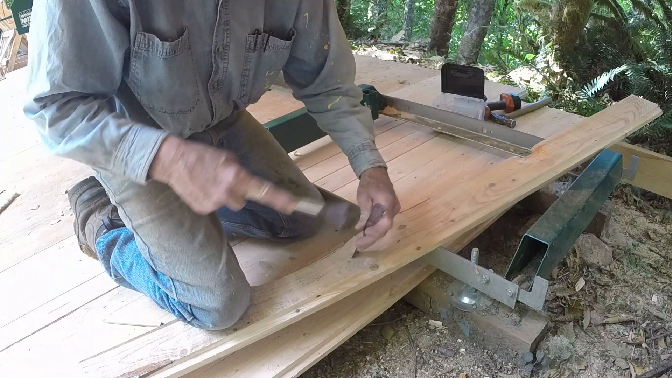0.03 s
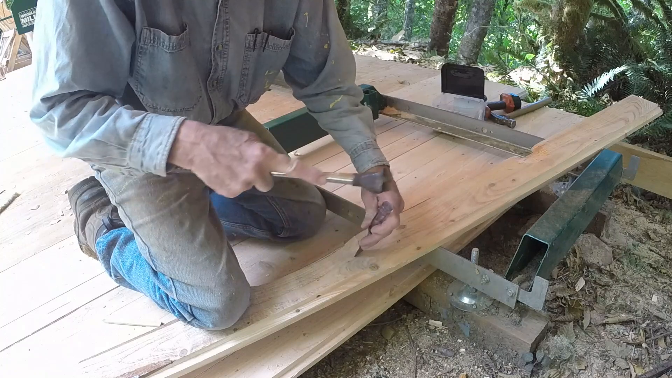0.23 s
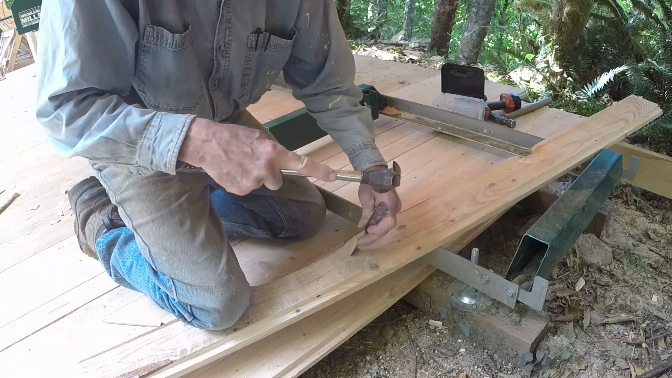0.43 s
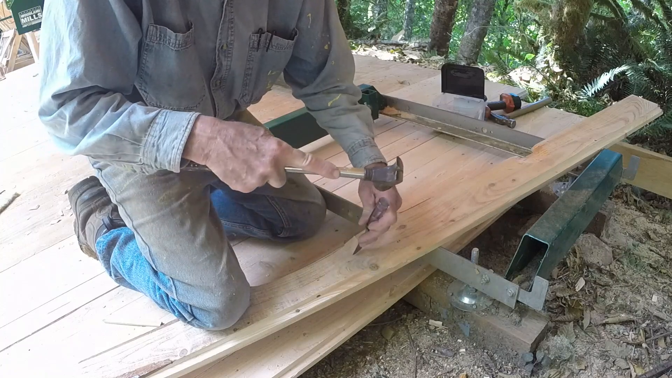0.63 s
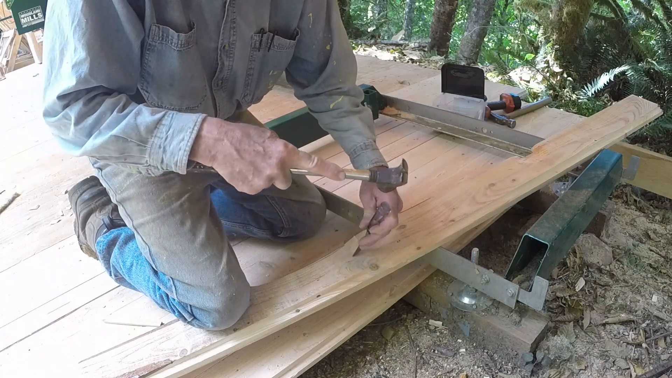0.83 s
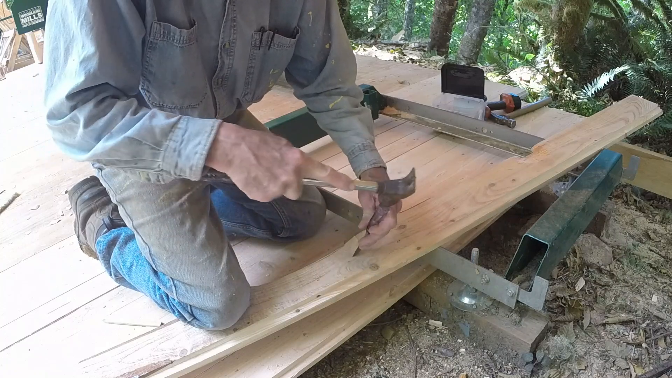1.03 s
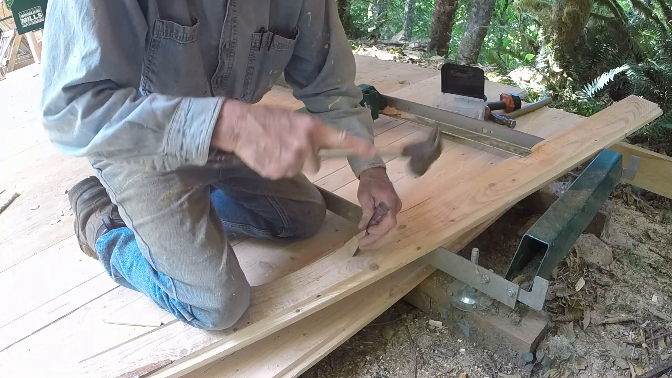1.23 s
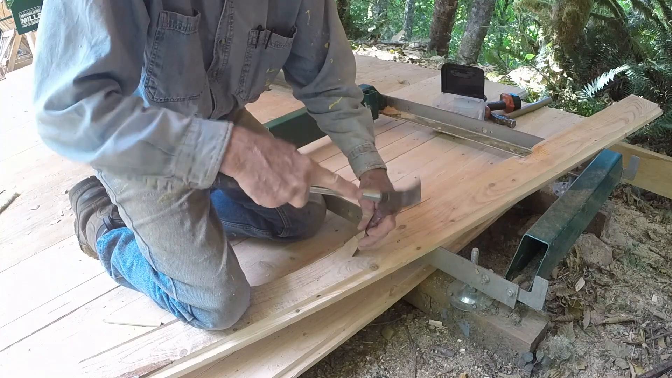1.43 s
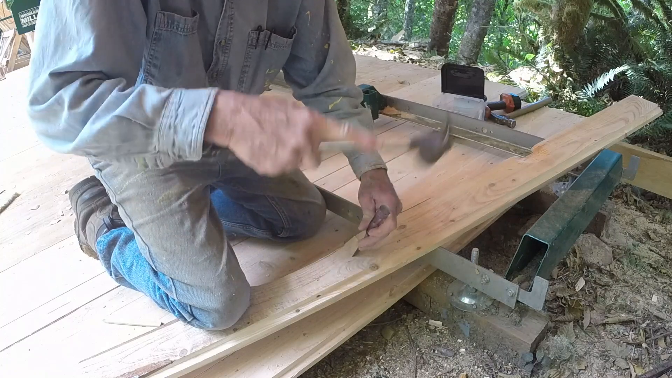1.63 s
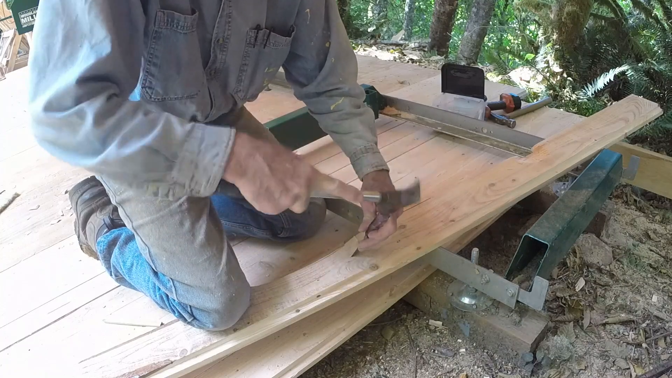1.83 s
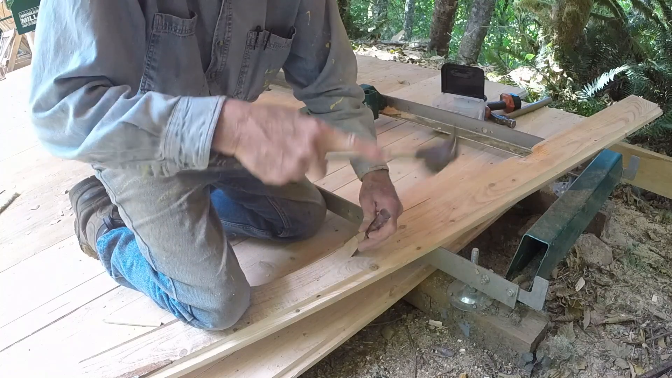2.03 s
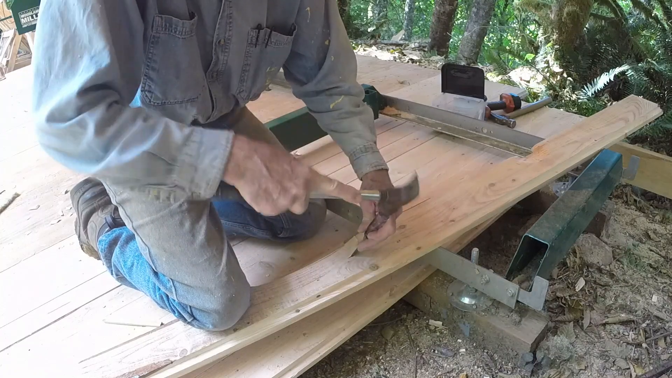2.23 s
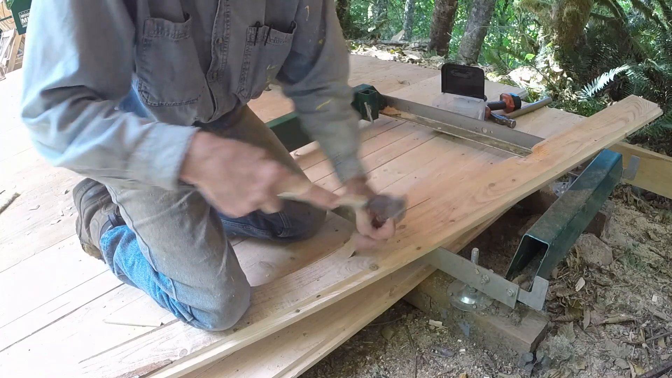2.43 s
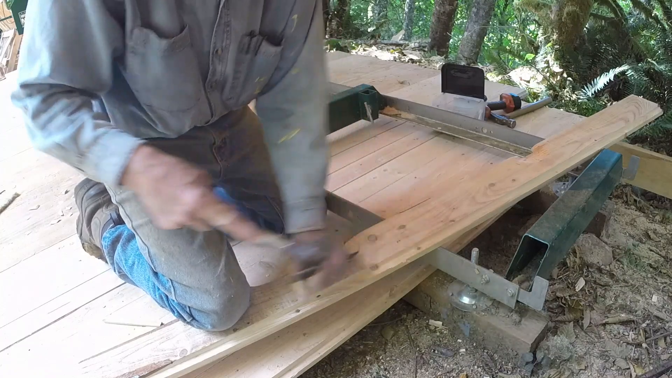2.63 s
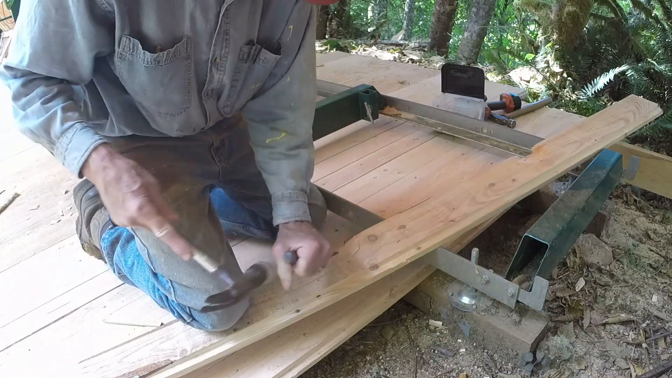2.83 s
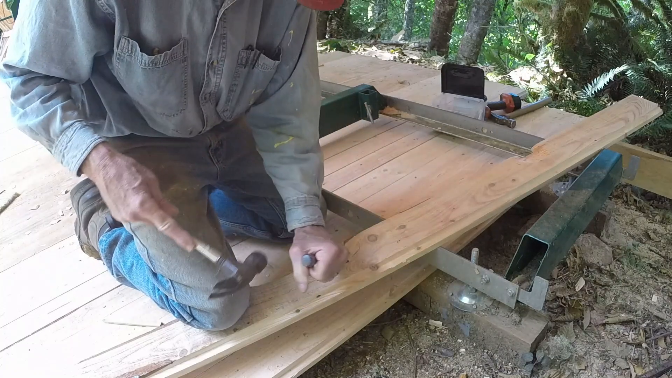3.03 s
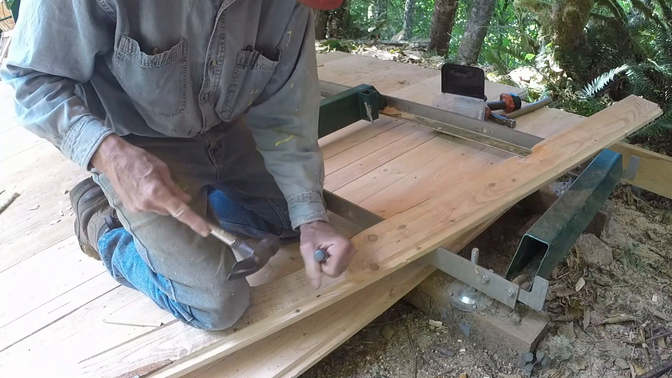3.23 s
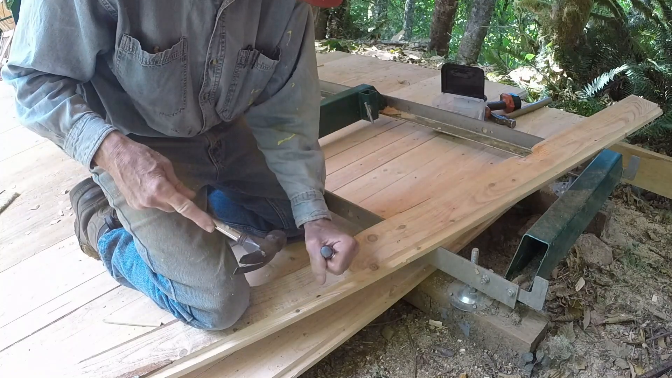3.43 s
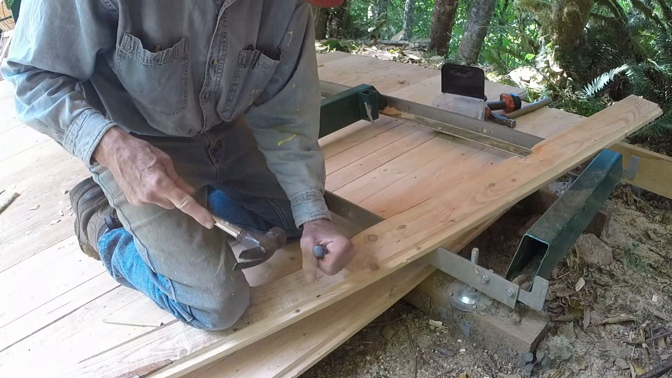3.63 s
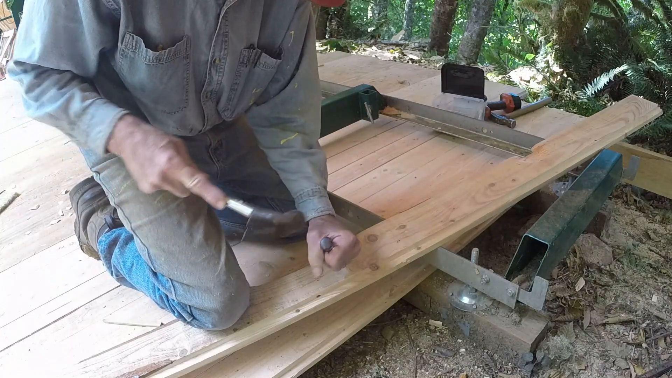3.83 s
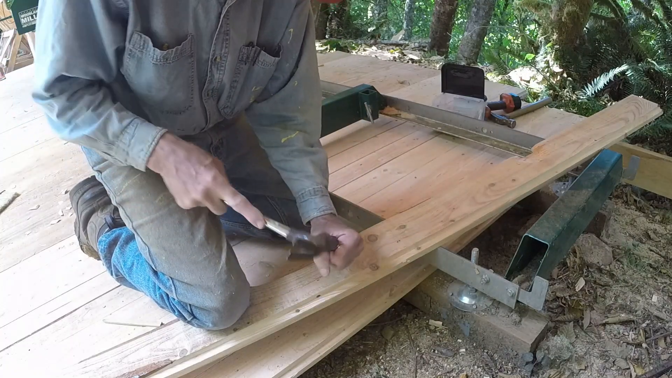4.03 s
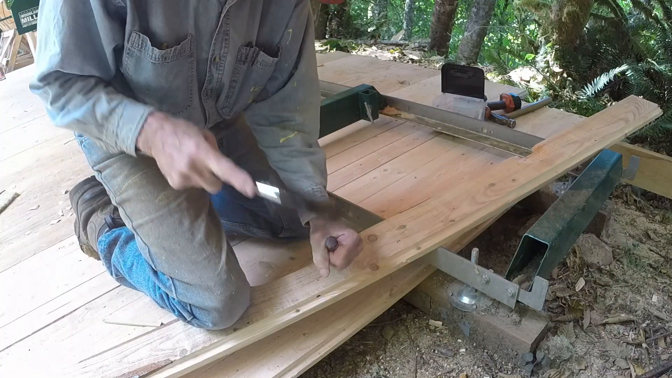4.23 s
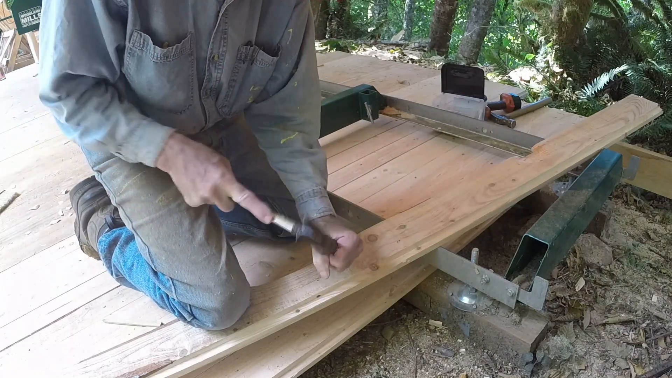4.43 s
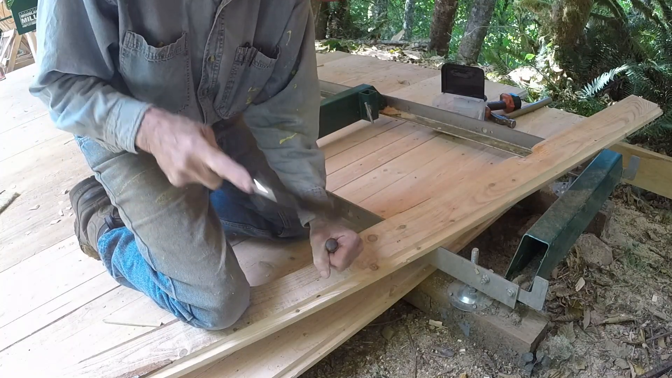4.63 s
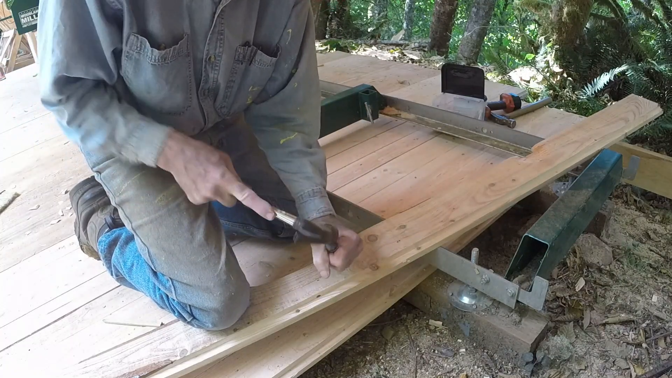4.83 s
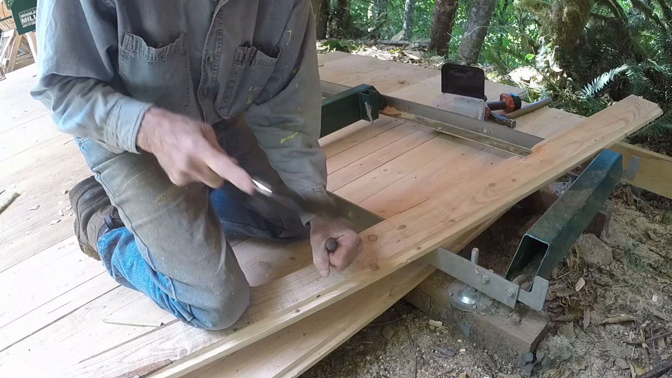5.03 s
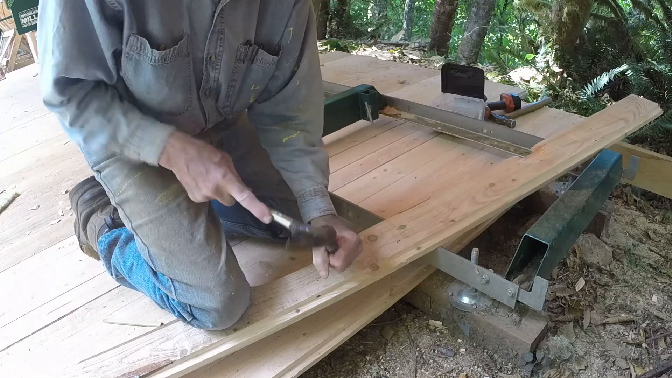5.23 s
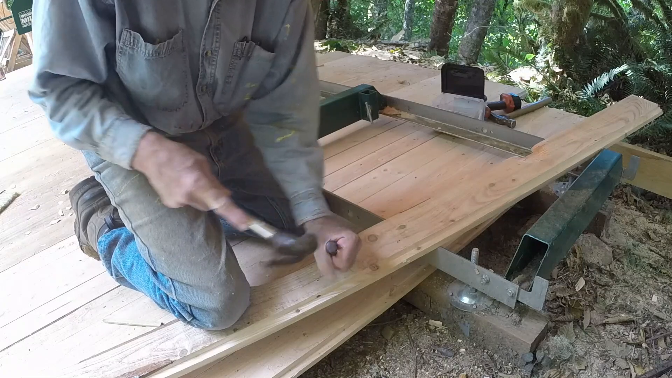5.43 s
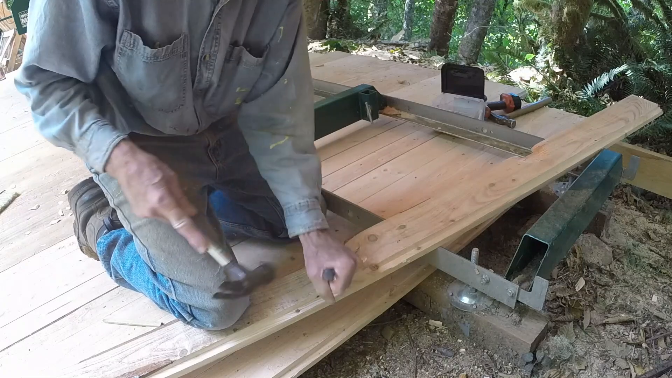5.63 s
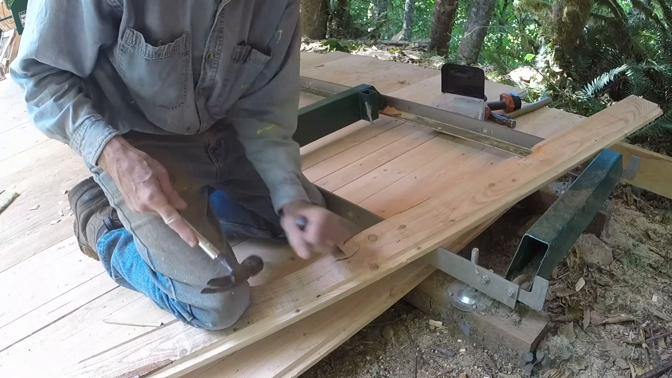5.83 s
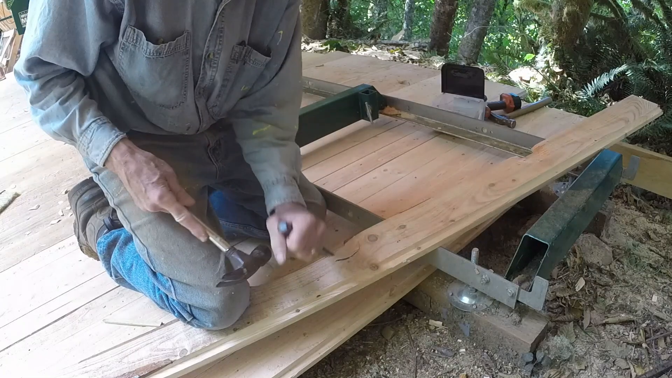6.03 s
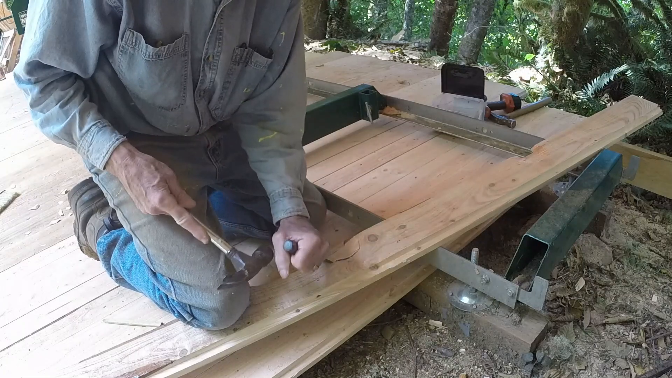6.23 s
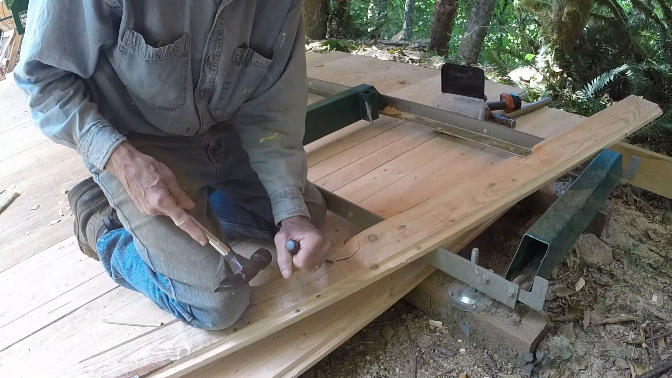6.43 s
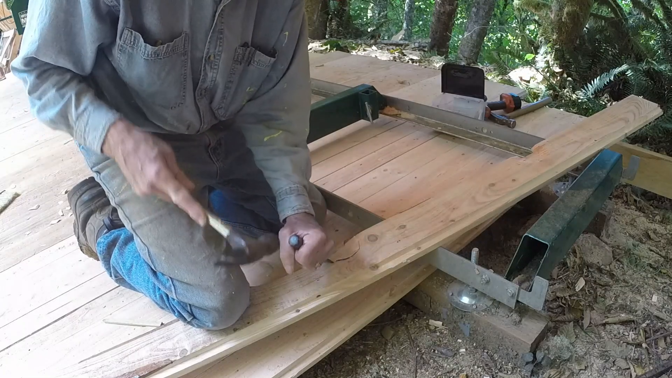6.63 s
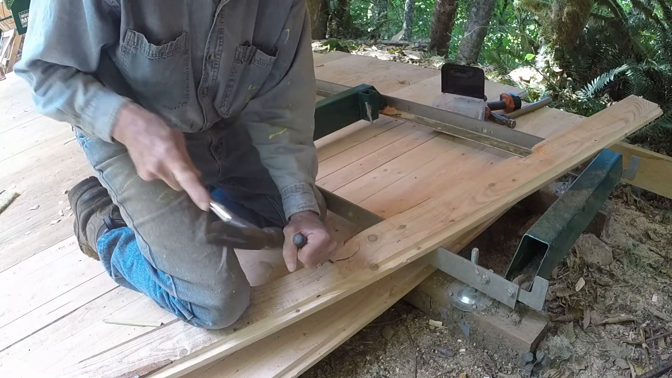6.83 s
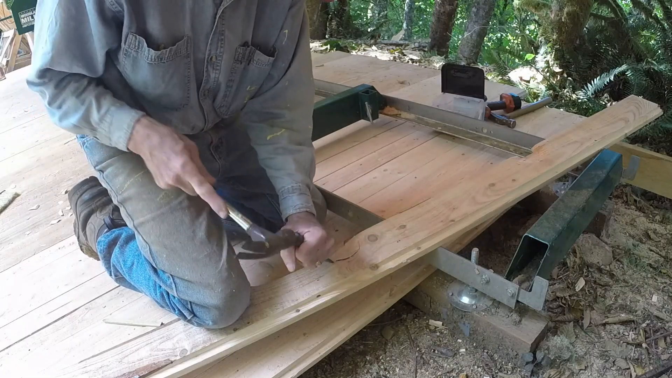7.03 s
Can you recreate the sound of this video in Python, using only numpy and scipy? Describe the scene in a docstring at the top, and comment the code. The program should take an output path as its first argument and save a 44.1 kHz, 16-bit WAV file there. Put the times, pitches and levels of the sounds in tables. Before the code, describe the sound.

A close microphone in an open shed among trees. At first only soft outdoor air and a low, wavering motor drone in the distance. At 1.5, 1.9 and 2.3 seconds a hammer hits a chisel set in a floorboard: loud, dry, hollow knocks around 800 Hz, with a biting wooden crunch, a small steel ping on the later two, low deck boom and quick shed echoes. The background ducks under the overload, then creeps back. Barely audible chip ticks come at 2.6 and 3.5. A light tap at 4.1 sets the edge, then full blows fall at 4.5, 4.9 and 5.3. At 5.75 a chip snaps sharply, followed by small scrapes and blade clinks to about 6.5. The motor sags in pitch and fades. One last solid, thumpy blow lands at 7.06. Light hiss and a very faint high whine persist.

```python
"""Close to the microphone, in an open shed among trees; a distant motor moves off as soft noise and sinking lines.
A hammer drives a chisel into a floorboard on a steel frame: three blows, then a few faint chips levered out.
A light blow sets the edge, three more follow, then chips snap and clink, and one last blow falls.
Each blow is a damped knock with echoes, ringing modes of deck, frame and chisel, and decaying noise bands.
The recorder's gain control turns everything down after an overload and creeps back; hiss and whine stay."""
import sys
import numpy as np
from scipy import signal
from scipy.fft import rfft, irfft, next_fast_len
from scipy.io import wavfile
from scipy.ndimage import uniform_filter1d, minimum_filter1d

SR = 44100
rng = np.random.default_rng(int(sys.argv[2]) if len(sys.argv) > 2 else 0)


def digitize_waveform(pressure):
    """Quantize a signal to 16-bit integers and store it at the path in sys.argv[1].

    Rows of a 2-D input are taken as channels; values are limited to [-1, 1].
    """
    field = np.atleast_2d(pressure).T
    bounded = np.clip(field, -1, 1)
    quanta = np.round(bounded * 32767).astype(np.int16)
    wavfile.write(sys.argv[1], SR, quanta)


N = 313110

# Levels of the work (blows, chips, and all they set ringing) are those before WORK_DB.
# Hammer blows, levels against a usual blow; the first of the second run is a light one that sets the edge:
# (time [s], knock [dB], thump [dB], bite [dB], crack [dB], ping [dB], knock pitch [Hz],
#  near return [dB], far return [dB])
HAMMER_BLOWS = [(1.5200, 1.7, 0, -0.5, -1.1, 2, 815, -1, -3),
                (1.923, -0.3, -3, 0.6, -0.5, 9.5, 835, -2, -6),
                (2.316, 0.25, -0.5, -5.5, -0.8, 8, 848, -6, -5),
                (4.1348, -11, -5, -17, -13.5, -20, 770, 0, 3),
                (4.5345, -0.5, -1.5, 1, 1, -8, 778, -2.5, -2.5),
                (4.9273, -2.4, -3, 0.8, 0.4, -7, 773, -1, -0.5),
                (5.3262, -1.2, -2, -0.6, 3.5, -6, 765, -1.5, -6.5),
                (7.0647, -2.1, 2.5, 5.5, -7, -2, 773, 0.5, 1)]
# Reflections of the knock from the shed: (delay [s], level [dB])
SHED_ECHOES = [(.01657, -11), (.01972, -20.5), (.02695, -13), (.04264, -17), (.04763, -22)]
# Chips snapping and scraping at the blade; the clink is against the chip's own level:
# (time [s], level [dB], t60 [s], clink of the blade [dB])
CHIP_EVENTS = [(2.646, -50, .02, -6.5), (3.456, -54, .015, -10), (5.682, -55, 0.097, 0),
               (5.7455, -23.5, 0.027, -6), (5.7575, -39.5, 0.098, -11), (5.912, -42.5, 0.015, -13),
               (5.9324, -54.5, 0.22, -6), (5.9746, -45, 0.027, -3.5), (5.9959, -52, 0.085, -8),
               (6.316, -53, 0.21, -5), (6.476, -59, 0.046, -12)]
# Modes of the wooden deck: (frequency [Hz], level [dB], t60 [s])
DECK_MODES = [(99.4, -25, 0.31), (123.4, -30.5, 0.44), (142.1, -20.5, 0.28), (160.8, -21, 0.28),
              (175.2, -34.5, 0.48), (193, -38, 0.35), (223.5, -33.5, 0.43), (263.6, -28.5, 0.38),
              (290, -30.5, 0.33), (336.4, -23.5, 0.25), (404.8, -24, 0.17), (499.5, -38, 0.36),
              (540.4, -26.5, 0.26), (605, -45, 0.34), (681, -38, 0.77), (713, -30.5, 0.51),
              (813, -51.5, 0.24), (894, -37, 0.25), (965, -17.5, 0.1), (1030, -40, 0.63),
              (1041, -25.5, 0.19), (1415, -35.5, 0.22), (1452, -37, 0.17), (1715, -43.5, 0.17),
              (2000, -47.5, .2), (2370, -49, 0.36), (2360, -47, .18)]
# Modes of the steel frame: (frequency [Hz], level [dB], t60 [s])
FRAME_MODES = [(101.4, -41.5, 1.46), (261, -43, 0.5), (314.3, -39, 0.84), (698, -44.5, 1.7),
               (748, -39.5, 1.04), (991.8, -32.5, 1.87), (1130, -56.5, 0.78), (1560, -60.5, 0.72),
               (2420, -66.5, 0.79), (2740, -64, 0.44)]
# Modes of the chisel, damped by the hand: (frequency [Hz], level [dB], t60 [s])
CHISEL_MODES = [(2510, -8.5, 0.04), (2940, -33.5, 0.15), (3400, -30, 0.11), (3660, -19, 0.091),
                (5050, -27, 0.15), (5550, -24.5, 0.16), (5860, -23.5, 0.08), (6530, -22, 0.081),
                (6770, -31, 0.12)]
# Noise of the edge cutting in: (frequency [Hz], level [dB per Hz], t60 [s])
CUTTING_NOISE = [(60, -93, .03), (500, -57.5, .03), (1220, -58.5, 0.02), (1517, -43, 0.046),
                 (2015, -60, 0.024), (2430, -51.5, 0.064), (2910, -61, 0.027), (3560, -52.5, 0.017),
                 (4340, -65, 0.033), (6170, -54.5, 0.0093), (8200, -71, 0.019), (11100, -80, 0.03),
                 (15000, -89.5, .018)]
# Diffuse tail of the shed: (frequency [Hz], level [dB per Hz], t60 [s])
SHED_TAIL = [(45, -90.5, .3), (100, -52, 0.6), (260, -56.5, 0.54), (453, -53, 0.33), (750, -47.5, 0.32),
             (1010, -48, 0.35), (1210, -66, 0.39), (1900, -70.5, 0.34), (2370, -75, 0.41),
             (3100, -71.5, 0.17), (4200, -84, 0.29), (5400, -83.5, 0.26), (7000, -96.5, 0.34),
             (8400, -100, 0.32), (15000, -111, .14)]
# Spectrum of a breaking chip: (frequency [Hz], level [dB per Hz])
CHIP_SPECTRUM = [(60, -89), (300, -80), (750, -31.5), (1500, -56), (2500, -50.5), (3600, -46.5),
                 (4400, -50.5), (6500, -45), (8000, -56), (11000, -58), (15000, -79)]
# Lines of the distant motor, each swelling and then fading:
# (usual frequency [Hz], peak level [dB], peak time [s], swell [dB per s], fade [dB per s])
MOTOR_TONES = [(69, -44, 4.0, 0.2, 11), (113.7, -37, 0.39, 15, 3.5), (432, -54.5, 1.2, 11, 8.5)]
# The motor's pitch wavers, then sags as it moves off: (time [s], share of its usual pitch [1])
MOTOR_PITCH_CURVE = [(0, 1.03), (1.4, 0.96), (3.5, 1.007), (4.4, .93), (7.1, 0.79)]
# Outdoor air, before AIR_DB: (frequency [Hz], level [dB per Hz])
AIR_SPECTRUM = [(25, -76.5), (50, -70), (100, -68), (175, -75.5), (300, -81), (420, -77), (520, -81.5),
                (850, -77.5), (1100, -82.5), (1500, -95.5), (2500, -97.5), (4000, -104), (6000, -107),
                (9000, -115), (15000, -122)]

CLOCK = np.arange(N) / SR
AFTER = CLOCK[:SR // 2]   # time since a contact
BAND_EDGES = np.geomspace(45, 17000, 29)   # Hz
BAND_HZ = np.sqrt(BAND_EDGES[1:] * BAND_EDGES[:-1])

WORK_DB = 9.5   # blows and chips are close to the microphone
NEAR_RETURN_S, FAR_RETURN_S = .00554, .00972   # the bending wave comes back from two supports of the board
PING_HZ, PING_DB, PING_T60_S = 4900, -56, .22   # steel meets steel
AIR_DB, AIR_FADE_DB_PER_S = 2, .25
ROAR_HZ, ROAR_FADE_DB_PER_S = 448, 0.63   # the roar around ROAR_HZ fades with the motor
# the gain control acts above this level over full scale, by so many dB for each dB, down to DUCK_DB
DUCK_ABOVE_DB, DUCK_RATIO, DUCK_DB = 4, 4, 9
DUCK_HOLD_S, RECOVER_DB_PER_S = 0.45, 16
HISS_DB = -122   # per Hz
WHINE_HZ, WHINE_DB = 11570, -89.5   # faint electronic whine
CUTOFF_HZ = 15800


def hammering(bands, chisel, knock_db=-0.27, bite_db=-19.0, bite_hz=2400, bite_delay_s=0.0023,
              chisel_db=-27, same_tail=0.44, patchy_db=2):
    """Every blow excites the same board, deck, frame and shed, with a colour of its own."""
    out = np.zeros(N)
    deck = body(DECK_MODES, AFTER, rise_cycles=2.66)
    frame = body(FRAME_MODES, CLOCK[:2 * SR], rise_cycles=18)
    cutting = decays(CUTTING_NOISE, rise_s=0.0013, rise_cycles=1.17)
    shed = decays(SHED_TAIL, rise_s=0.0008, rise_cycles=0.2)
    fixed_paths = stretch(bands)
    steel = steel_ping()
    for s, strength, thump, bite, crack, ping, hz, near_db, far_db in HAMMER_BLOWS:
        colour = [(250, thump), (450, strength), (1300, strength), (2300, bite), (3800, crack)]
        gains = from_db(at_hz(colour, BAND_HZ)[0])
        add(out, s, from_db(knock_db + strength) * knock(hz, near_db, far_db))
        add(out, s, from_db(PING_DB + ping) * steel)
        # the grain breaks differently at every blow
        patches = from_db(patchy_db * rng.standard_normal(len(BAND_HZ)))
        add(out, s - .0008, gains * patches @ (cutting * stretch(bands)))
        # the edge stops in the wood with a short yelp, its pitch varied at random
        yelp = packet(bite_hz * (1 + rng.normal() / 20), peak_s=0.00095)
        add(out, s + bite_delay_s, from_db(bite_db + bite) * yelp)
        add(out, s, from_db(chisel_db) * ring(chisel, colour, scatter_db=4.5))
        add(out, s, ring(deck, colour, scatter_db=2.5))
        # the frame takes up the weight of the blow as much as its knock
        frame_colour = [(1200, (thump + strength) / 2), (2300, bite)]
        add(out, s, ring(frame, frame_colour, scatter_db=1.46))
        # part of the tail keeps the same paths through the shed from blow to blow
        paths = np.sqrt(same_tail) * fixed_paths + np.sqrt(1 - same_tail) * stretch(bands)
        add(out, s, gains @ (shed * paths))
    return out


def knock(hz, near_db, far_db):
    """The board's bending wave, its two returns and the first reflections of the shed."""
    wave = packet(hz, peak_s=0.0015)
    out = np.zeros(len(AFTER))
    arrivals = [(0, 0), (NEAR_RETURN_S, near_db), (FAR_RETURN_S, far_db)]
    for delay, db in arrivals + list(SHED_ECHOES):
        add(out, delay, from_db(db) * wave)
    return out


def packet(hz, peak_s):
    """A heavily damped resonance: a few cycles under an envelope that crests at 1."""
    age = AFTER / peak_s
    envelope = age ** 2 * np.exp(2 * (1 - np.minimum(age, 20)))
    return envelope * np.sin(2 * np.pi * hz * AFTER)


def steel_ping():
    """Steel on steel: one high mode that builds up and dies away."""
    return np.sin(2 * np.pi * PING_HZ * AFTER) * swell(AFTER, .002, PING_T60_S)


def chips(bands, chisel, room_db=-16, room_t60=0.31, room_hz=6600, grain_db=3, patchy_db=3):
    """Fibres tear in uneven grains and make the blade clink, with a duller tail from the shed behind."""
    out = np.zeros(N)
    dull = 1 / (1 + (BAND_HZ / room_hz) ** 6)
    for s, db, t60, clink_db in CHIP_EVENTS:
        # every chip has a colour of its own
        patches_db = patchy_db * rng.standard_normal(len(BAND_HZ))
        gains = from_db(at_hz(CHIP_SPECTRUM, BAND_HZ)[0] + patches_db)
        grains = from_db(grain_db * drift(524, AFTER))
        snap = (gains @ stretch(bands)) * grains * swell(AFTER, 0.00055, t60)
        tail = (gains * dull @ stretch(bands)) * swell(AFTER, 0.014, room_t60)
        add(out, s, from_db(db) * (snap + from_db(room_db) * tail))
        add(out, s, ring(chisel, [(1000, db + clink_db)], scatter_db=5.5))
    return out


def body(modes, t, rise_cycles):
    """The pitches of a body's modes and the ring of each; low ones take longer to build."""
    rings = []
    for k, (hz, db, t60) in enumerate(modes):
        sign = (-1) ** k   # neighbours start in opposite directions
        rings.append(sign * from_db(db) * np.sin(2 * np.pi * hz * t) * swell(t, rise_cycles / hz, t60))
    return np.array(modes)[:, 0], np.array(rings)


def ring(struck, colour, scatter_db):
    """Each contact weights the modes by its colour and a little by chance."""
    hz, rings = struck
    weights_db = at_hz(colour, hz)[0] + scatter_db * rng.standard_normal(len(hz))
    return from_db(weights_db) @ rings


def decays(table, rise_s, rise_cycles):
    """One envelope for each band: lows build later, and every band dies at its own rate."""
    level_db, t60 = at_hz(table, BAND_HZ[:, None])
    return from_db(level_db) * swell(AFTER, rise_s + rise_cycles / BAND_HZ[:, None], t60)


def swell(t, rise_s, t60):
    """An envelope that builds up and dies away by 60 dB in each t60."""
    return (1 - np.exp(-(t / rise_s) ** 2)) * from_db(-60 * t / t60)


def noise_bands():
    """Two seconds of noise of unit density in each band."""
    white = rng.standard_normal((2, 2 * SR)) * np.sqrt(SR / 2)
    bands = []
    for k, edges in enumerate(zip(BAND_EDGES, BAND_EDGES[1:])):
        band = signal.butter(3, edges, "band", fs=SR, output="sos")
        bands.append(signal.sosfilt(band, white[k % 2]))   # neighbours use different noise
    return np.array(bands)


def stretch(bands):
    """A random half second of the band noise."""
    start = rng.integers(SR // 10, SR + SR // 2)
    return bands[:, start:start + len(AFTER)]


def motor(wander_share=0.0115, waver_db=1):
    """A few wavering lines carry through the trees, sinking in pitch and level as the motor moves off."""
    out = np.zeros(N)
    pitch = in_time(MOTOR_PITCH_CURVE)[0]
    for hz, db, peak_s, swell_db, fade_db in MOTOR_TONES:
        below_db = np.maximum(swell_db * (peak_s - CLOCK), fade_db * (CLOCK - peak_s))
        out += tone(hz * pitch, db - below_db, wander_share * hz, waver_db)
    return out


def tone(hz, db, wander_hz, waver_db):
    """A line about a given rms level whose pitch and strength wander."""
    phase = 2 * np.pi * np.cumsum(hz + wander_hz * drift(8.4)) / SR
    return np.sqrt(2) * from_db(db + waver_db * drift(11)) * np.sin(phase)


def air(flutter_db=.5, roar_octaves=1.78):
    """Soft outdoor noise whose low middle, the roar of the motor, slowly recedes."""
    size = next_fast_len(N)
    hz = np.maximum(np.fft.rfftfreq(size, 1 / SR), 1)
    white = rfft(rng.standard_normal(size)) * np.sqrt(SR / 2)
    spectrum = white * from_db(AIR_DB + at_hz(AIR_SPECTRUM, hz)[0])
    share = np.exp(-(np.log2(hz / ROAR_HZ) / roar_octaves) ** 2)
    roar = irfft(spectrum * share, size)[:N] * from_db(-ROAR_FADE_DB_PER_S * CLOCK)
    rest = irfft(spectrum * (1 - share), size)[:N] * from_db(-AIR_FADE_DB_PER_S * CLOCK)
    return (roar + rest) * from_db(flutter_db * drift(2.77))


def gain_control(x):
    """An overload turns the gain down at once; it stays down a moment, then creeps back."""
    hold, ahead = int(DUCK_HOLD_S * SR), SR // 250
    level_db = 20 * np.log10(np.abs(x) + 1e-9)
    over_db = np.clip(DUCK_RATIO * (level_db - DUCK_ABOVE_DB), 0, DUCK_DB)
    # the shifted window looks back over the hold time
    held_db = minimum_filter1d(-over_db, hold, origin=(hold - 1) // 2, mode="nearest")
    climb_db = RECOVER_DB_PER_S * CLOCK
    gain_db = np.minimum.accumulate(held_db - climb_db, axis=-1) + climb_db
    # the drop begins a few milliseconds early and is smoothed
    return x * from_db(uniform_filter1d(minimum_filter1d(gain_db, 3 * ahead), ahead))


def from_db(db):
    """Decibels to gain."""
    return 10 ** (np.asarray(db) / 20)


def at_hz(points, hz):
    """Every column of a spectrum table, read at given frequencies on a log scale."""
    freqs, *columns = np.transpose(points)
    return [np.interp(np.log(hz), np.log(freqs), c) for c in columns]


def in_time(rows):
    """Every column of a curve table, read at each sample."""
    s, *columns = np.transpose(rows)
    return [np.interp(CLOCK, s, c) for c in columns]


def add(out, s, sound):
    """Mix a sound in at a given time."""
    start = max(int(round(s * SR)), 0)
    part = sound[:len(out) - start]
    out[start:start + len(part)] += part


def drift(rate_hz, t=CLOCK):
    """Smooth chance with a spread of about 1, drawn afresh at the given rate."""
    knots = signal.resample(rng.standard_normal(400), 4000)
    return np.interp(t * rate_hz * 10, np.arange(len(knots)), knots)


def scene():
    """Work on the board close by, with the outdoors behind it."""
    bands = noise_bands()
    chisel = body(CHISEL_MODES, AFTER, rise_cycles=2)
    work = from_db(WORK_DB) * (hammering(bands, chisel) + chips(bands, chisel))
    return (work + motor() + air())[None]


def record(dry):
    """Gain control, then hiss and whine; a fast limiter holds crests near full scale and the top is cut."""
    hiss = from_db(HISS_DB) * np.sqrt(SR / 2) * rng.standard_normal(N)
    whine = np.sqrt(2) * from_db(WHINE_DB) * np.sin(2 * np.pi * WHINE_HZ * CLOCK)
    x = gain_control(dry) + hiss + whine
    span = SR // 250
    limit = 1 / np.maximum(np.abs(x), 1)
    gain = uniform_filter1d(minimum_filter1d(limit, span), span)
    top_cut = signal.cheby2(14, 70, CUTOFF_HZ + 500, fs=SR, output="sos")
    return signal.sosfilt(top_cut, x * gain)


dry = scene()
out = record(dry)
digitize_waveform(out)
```